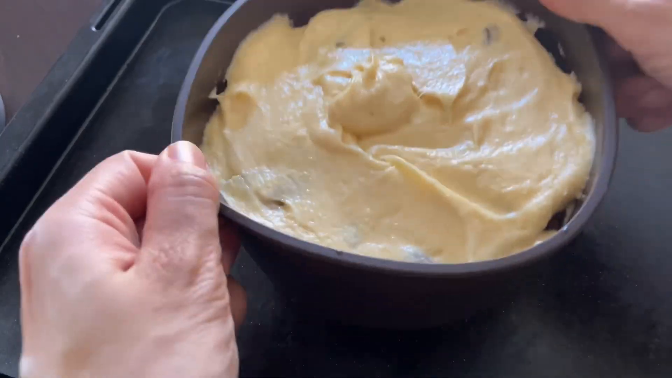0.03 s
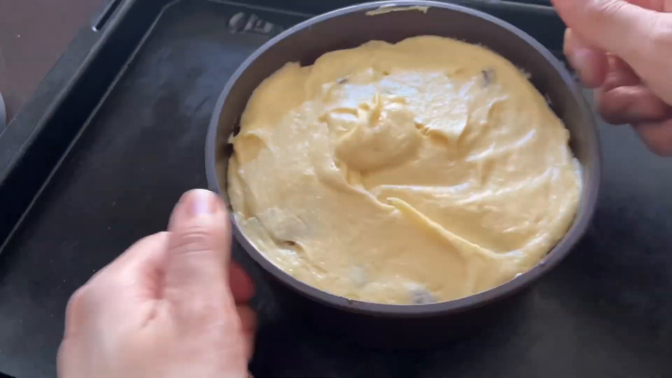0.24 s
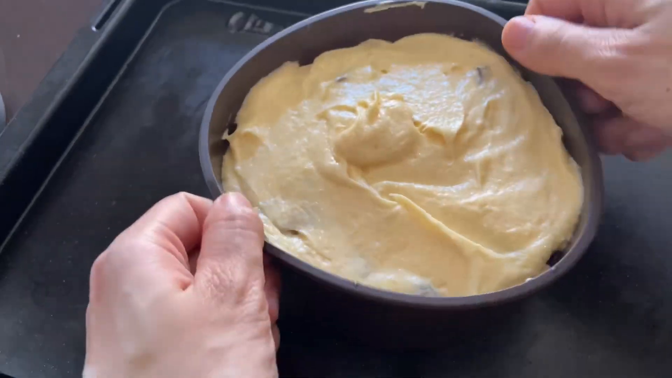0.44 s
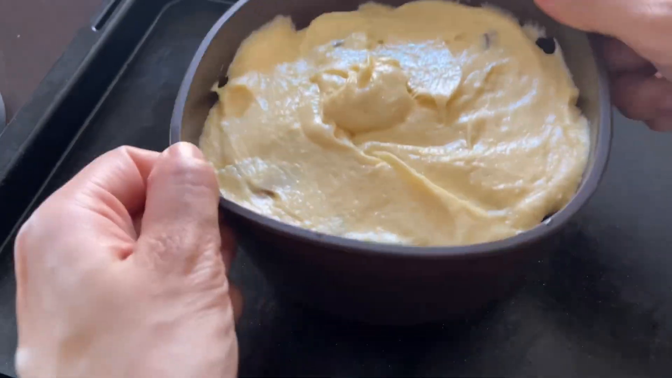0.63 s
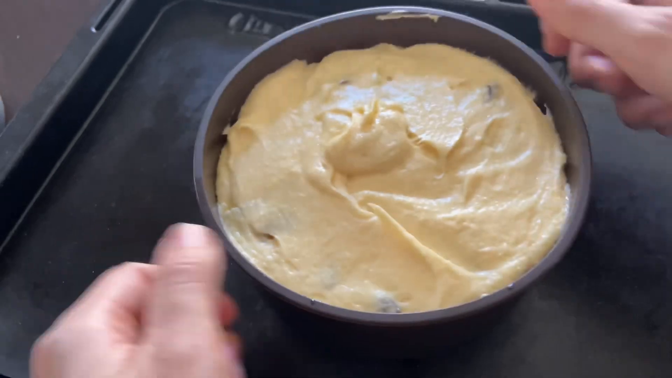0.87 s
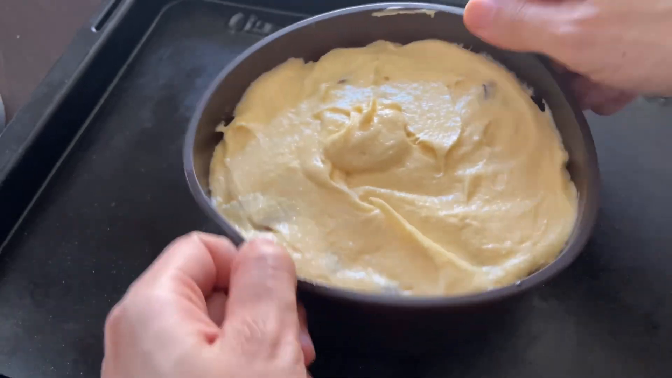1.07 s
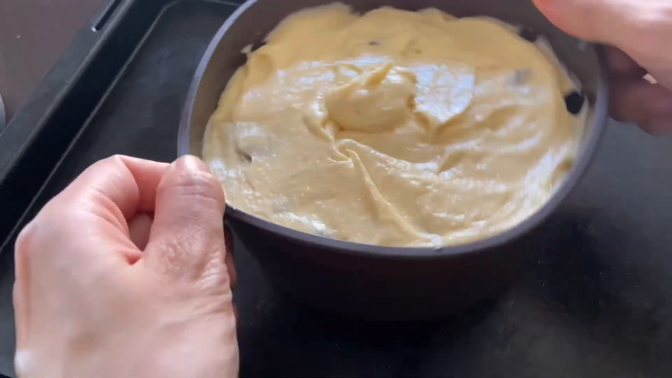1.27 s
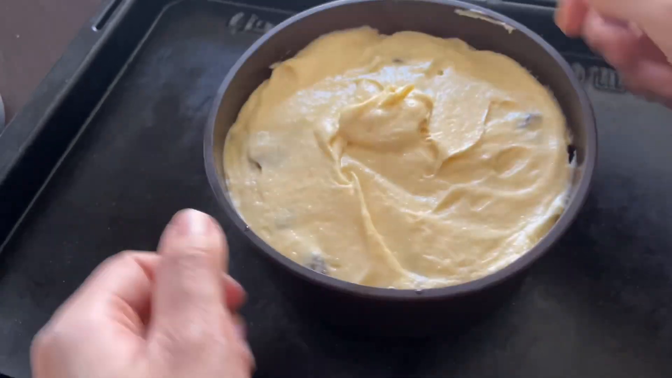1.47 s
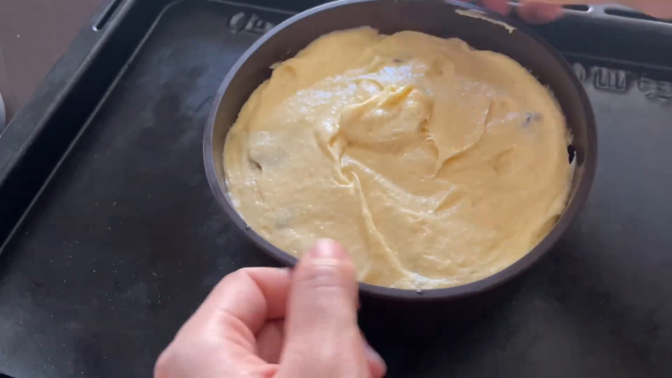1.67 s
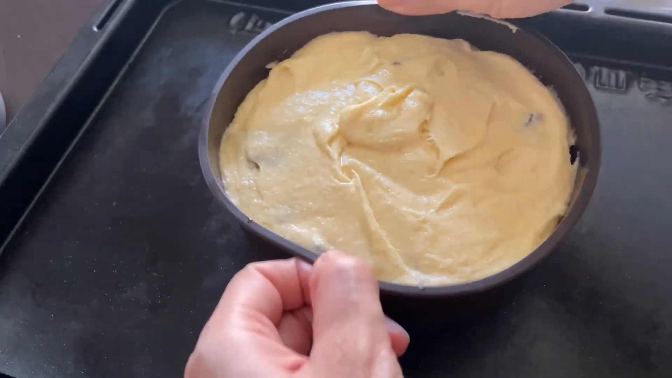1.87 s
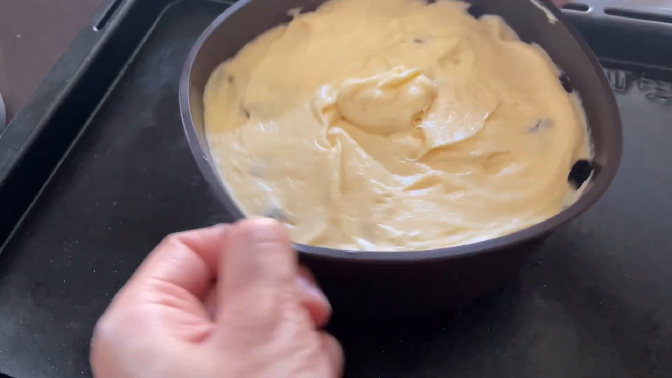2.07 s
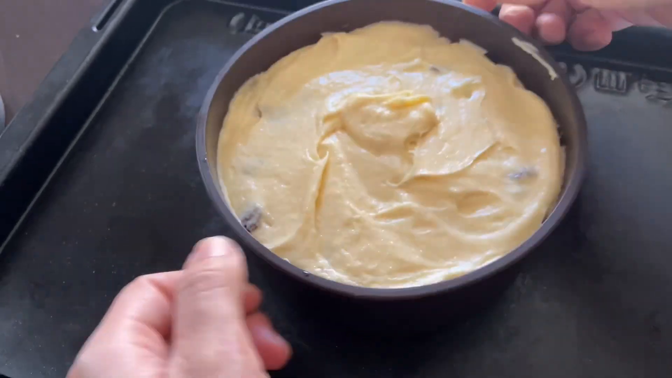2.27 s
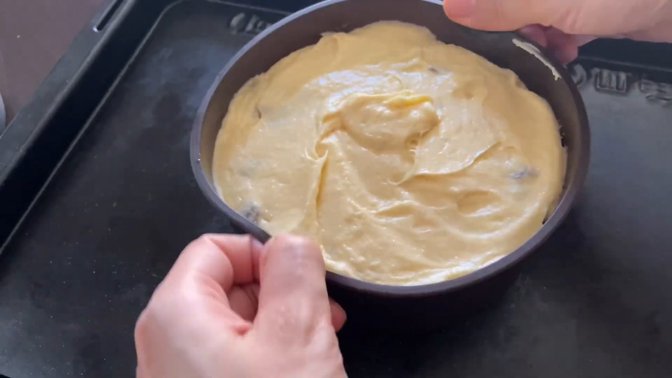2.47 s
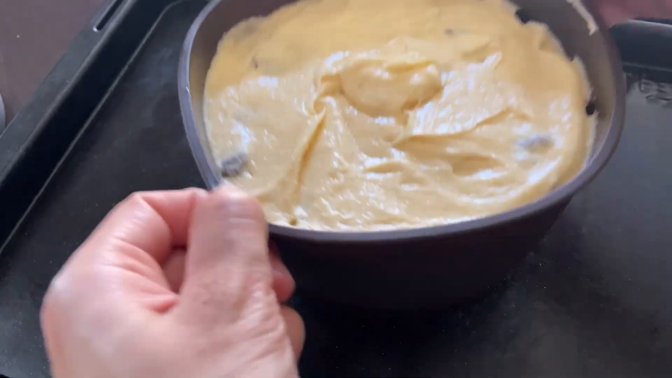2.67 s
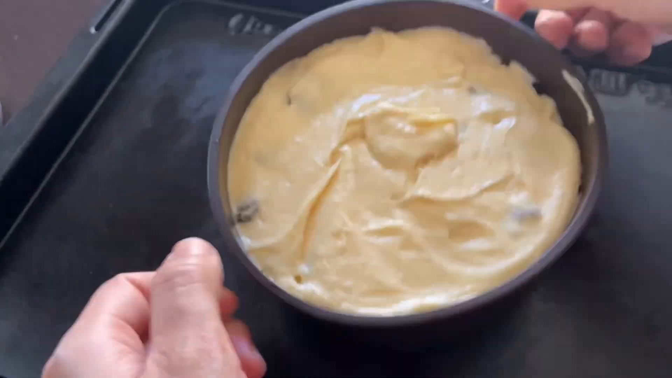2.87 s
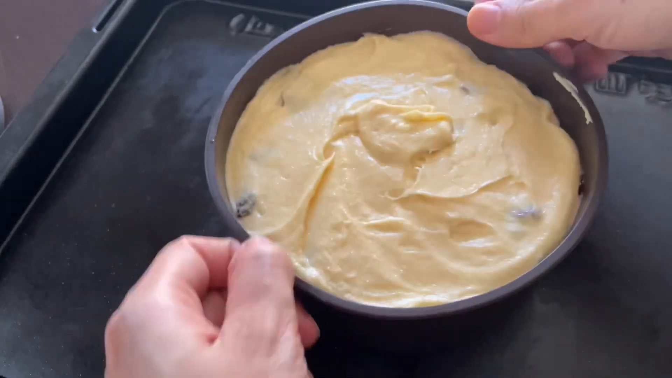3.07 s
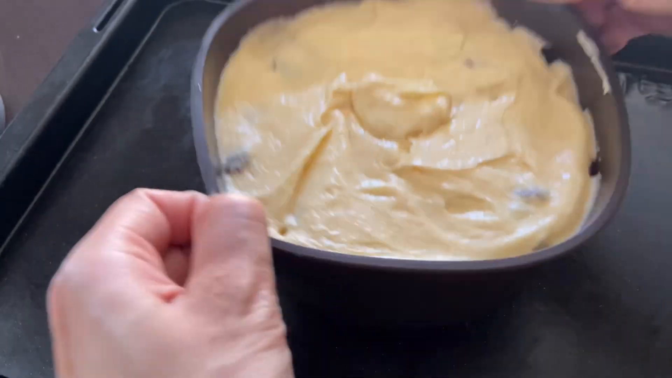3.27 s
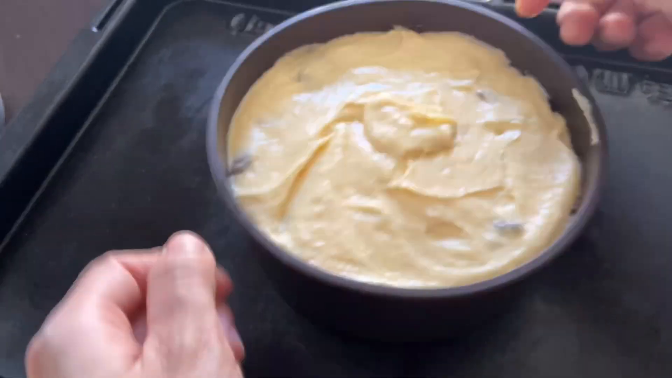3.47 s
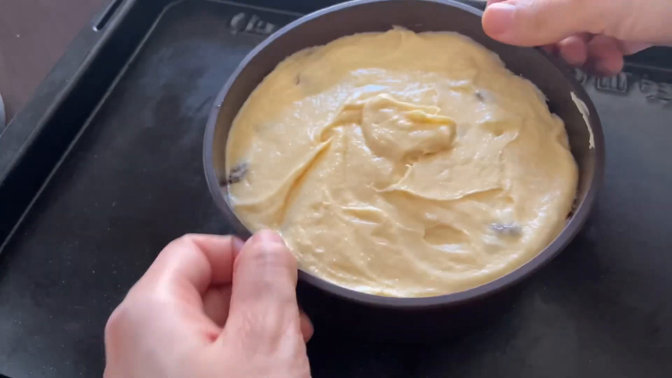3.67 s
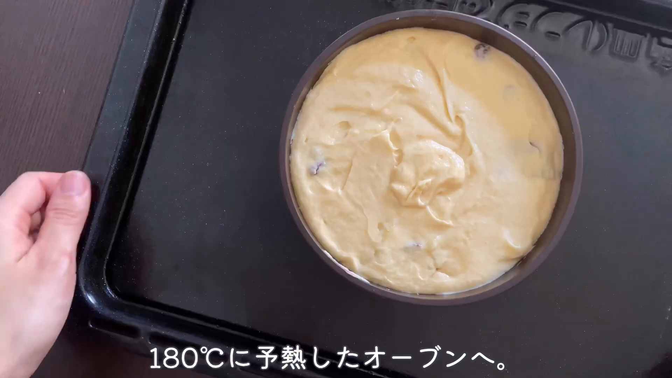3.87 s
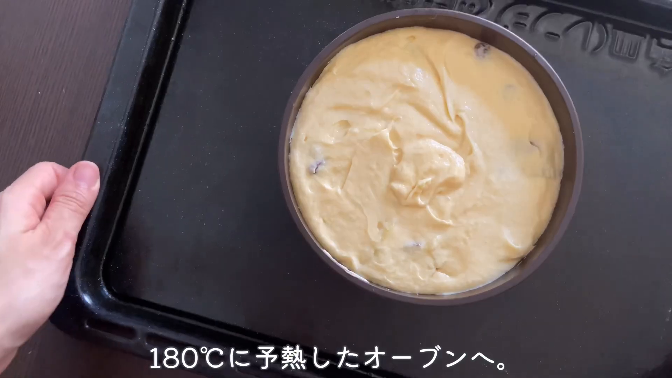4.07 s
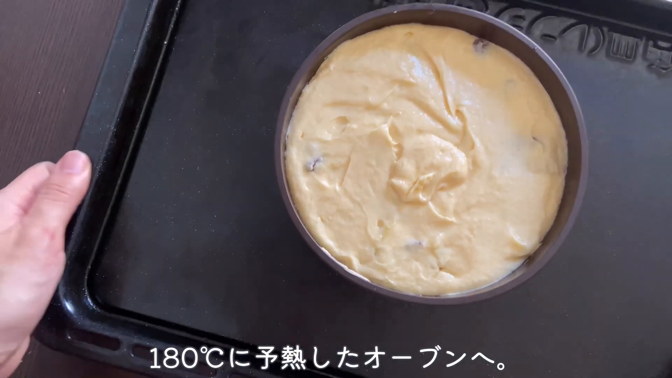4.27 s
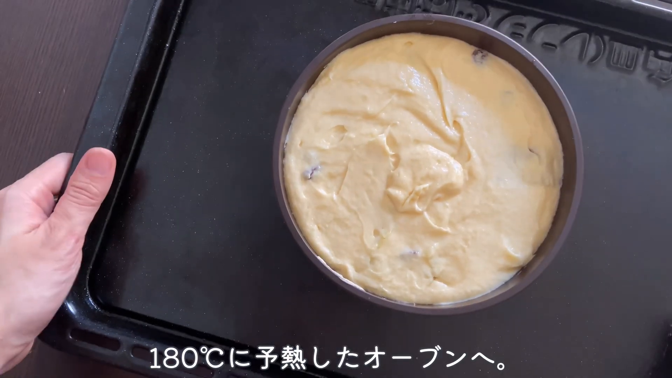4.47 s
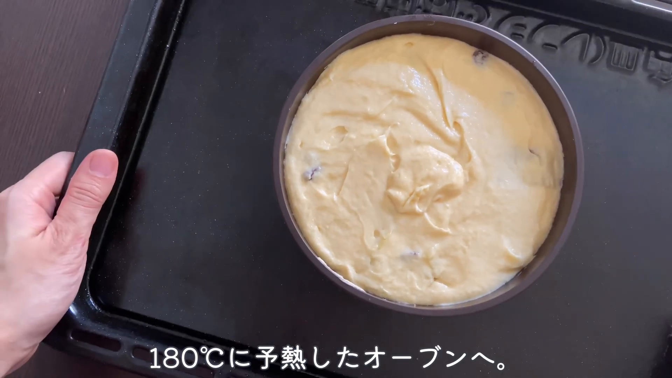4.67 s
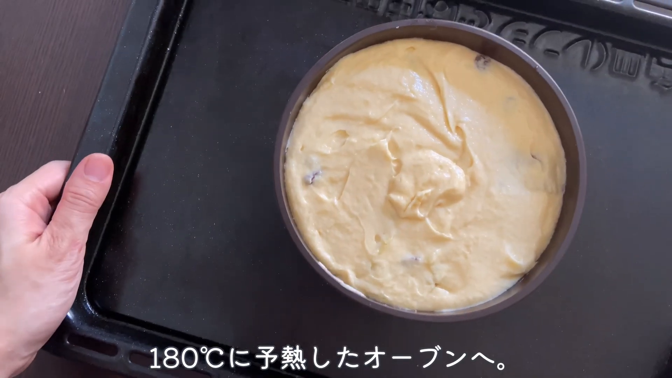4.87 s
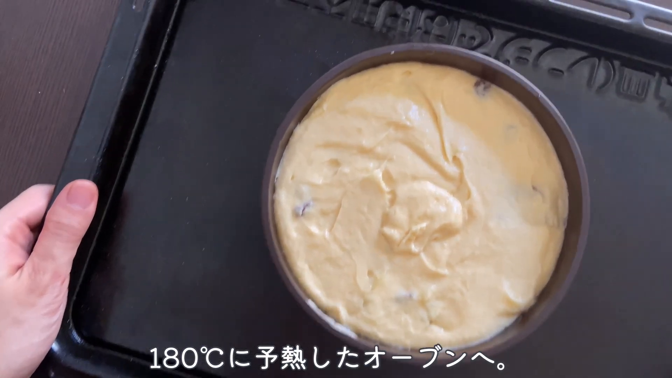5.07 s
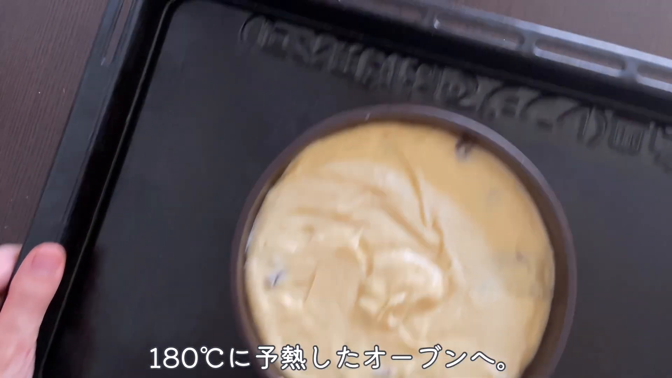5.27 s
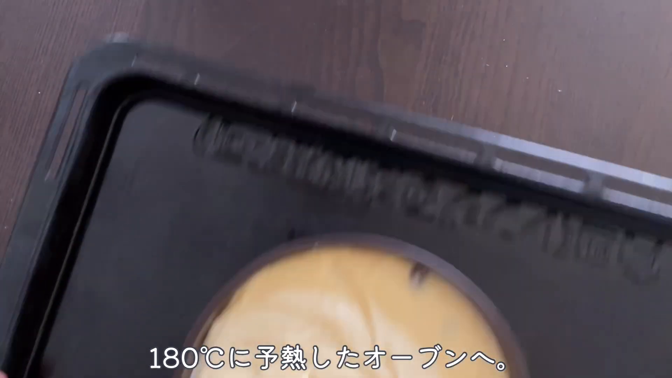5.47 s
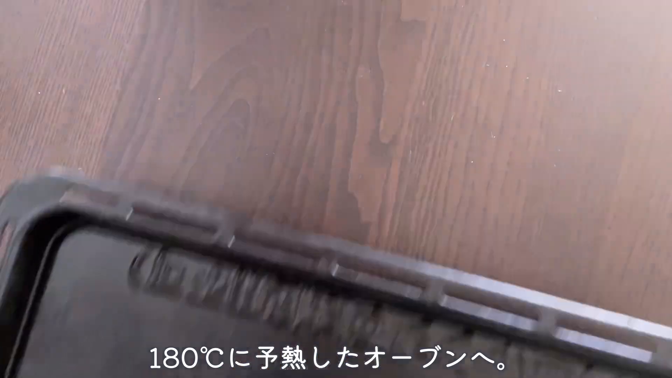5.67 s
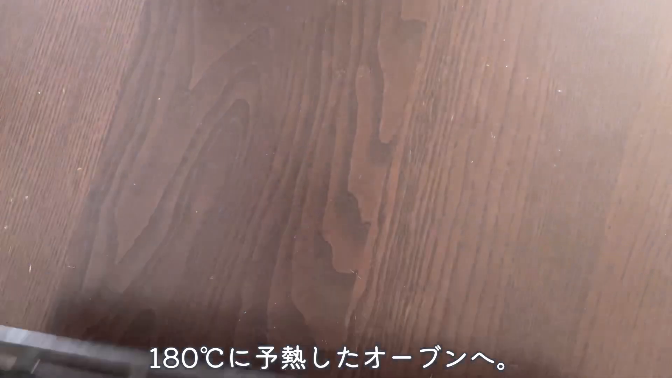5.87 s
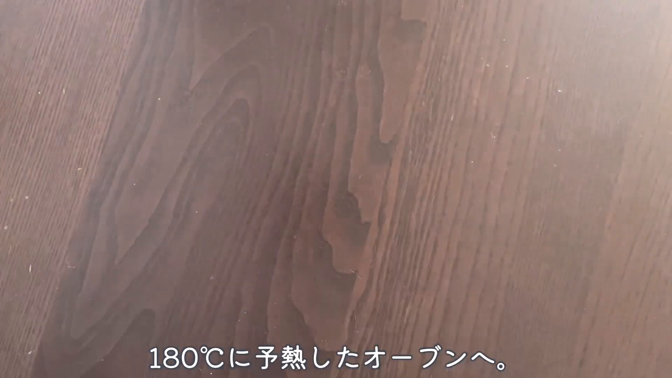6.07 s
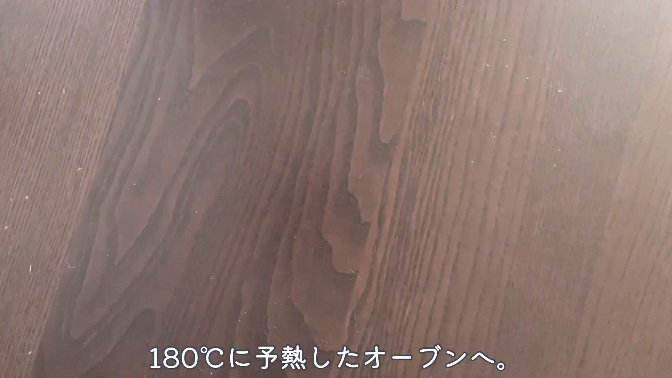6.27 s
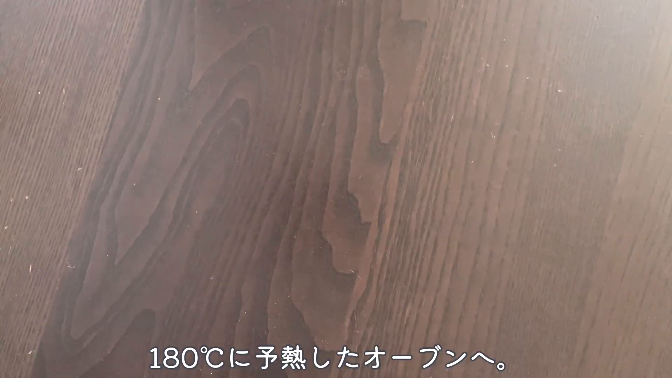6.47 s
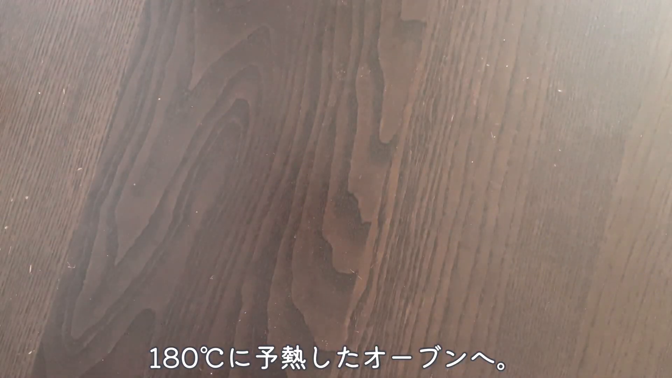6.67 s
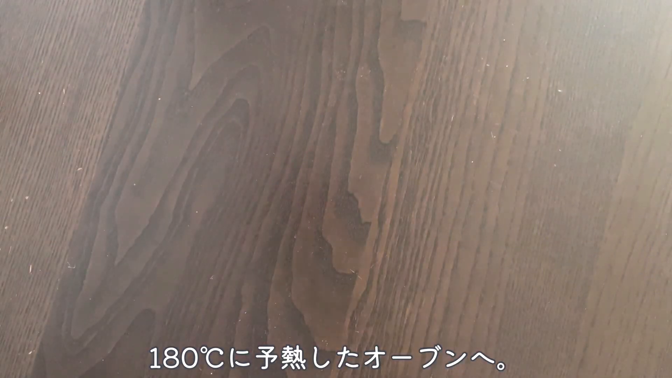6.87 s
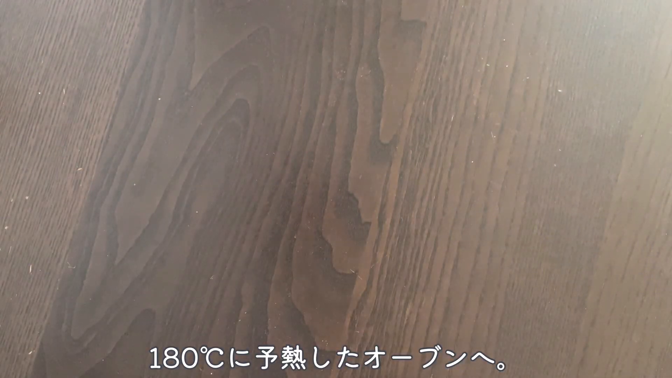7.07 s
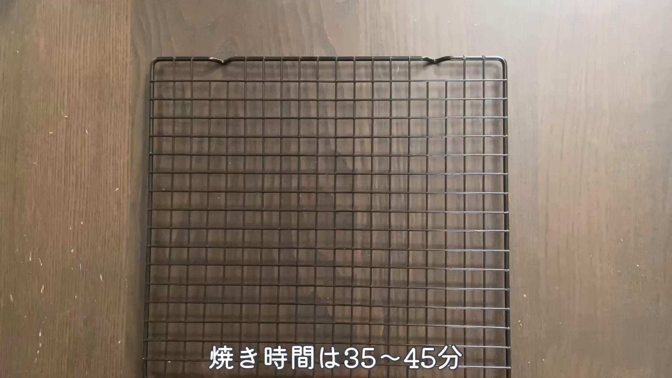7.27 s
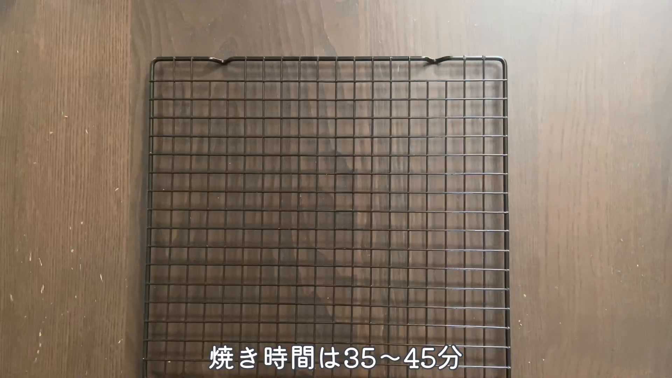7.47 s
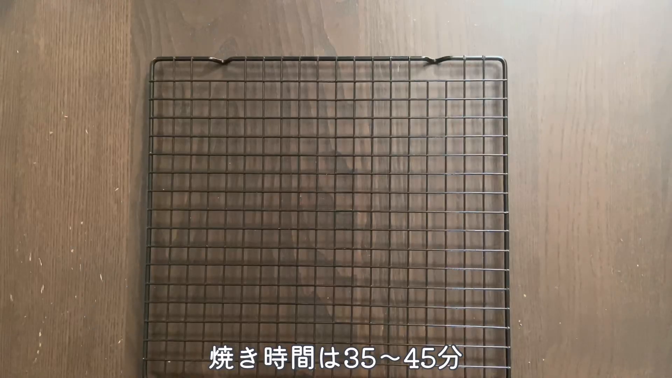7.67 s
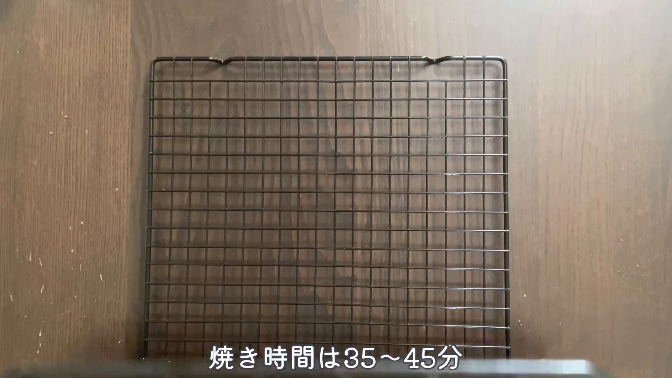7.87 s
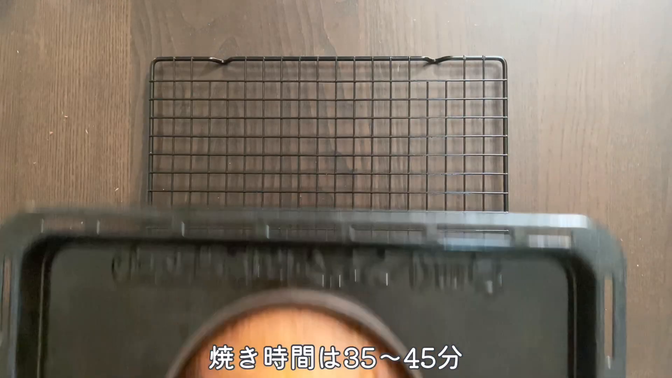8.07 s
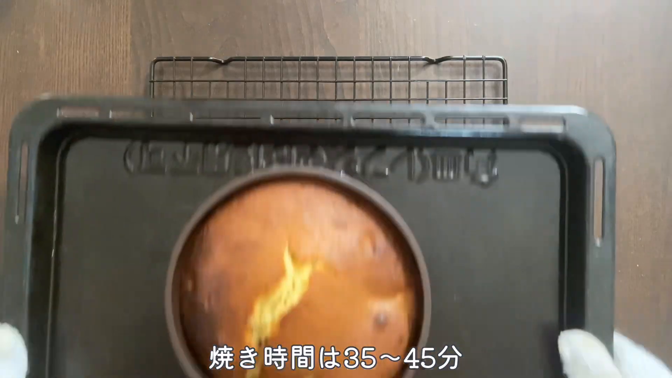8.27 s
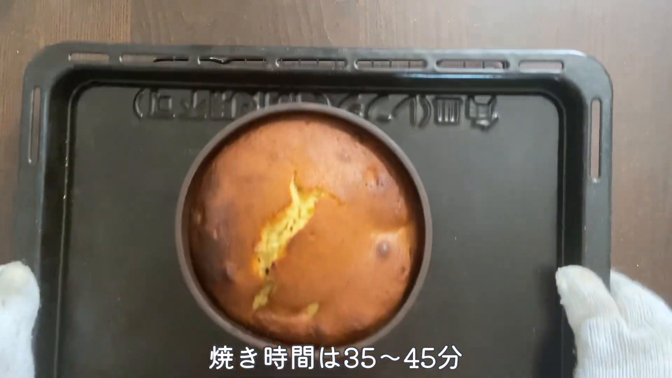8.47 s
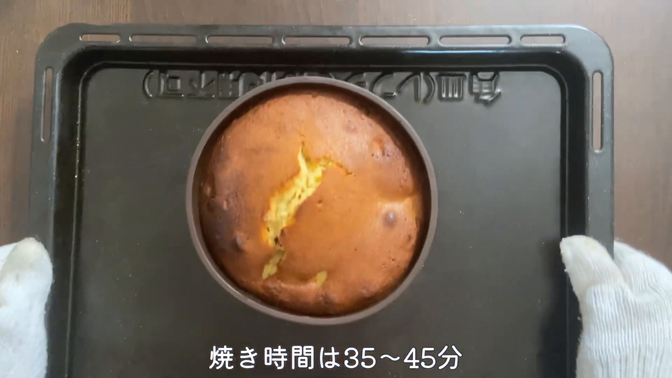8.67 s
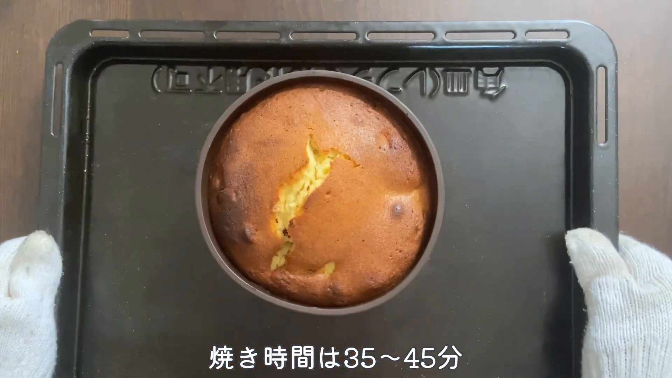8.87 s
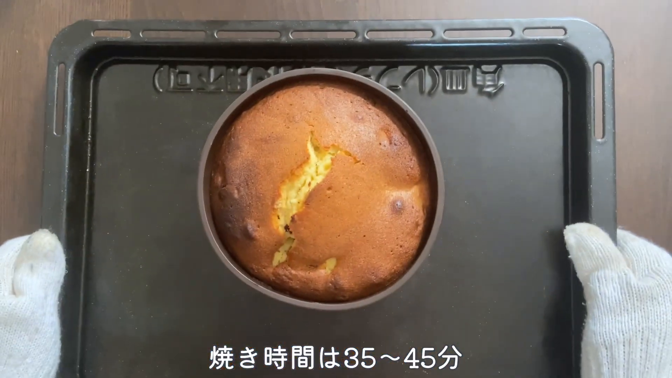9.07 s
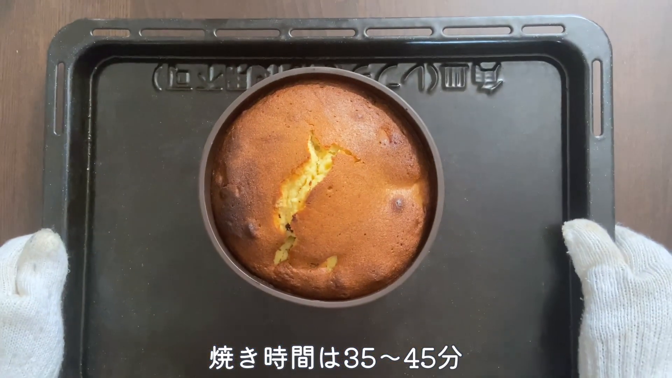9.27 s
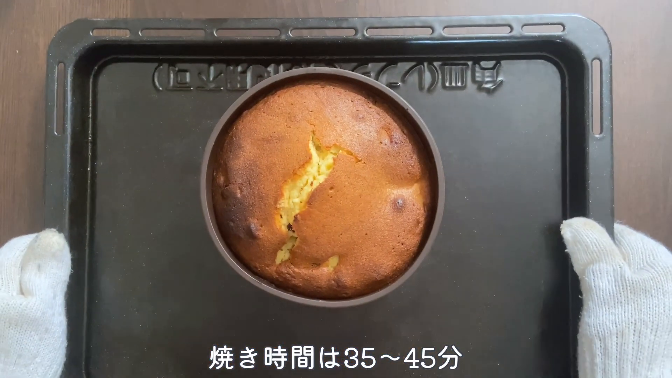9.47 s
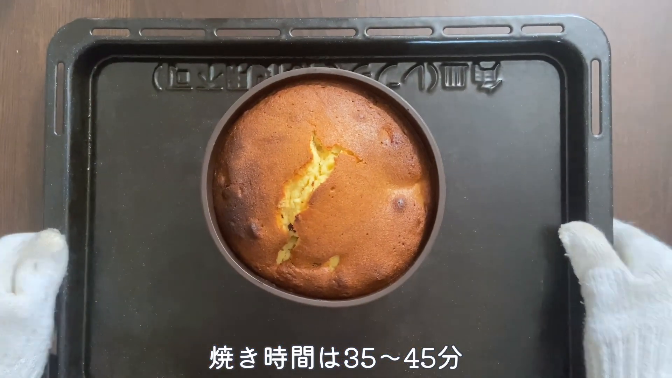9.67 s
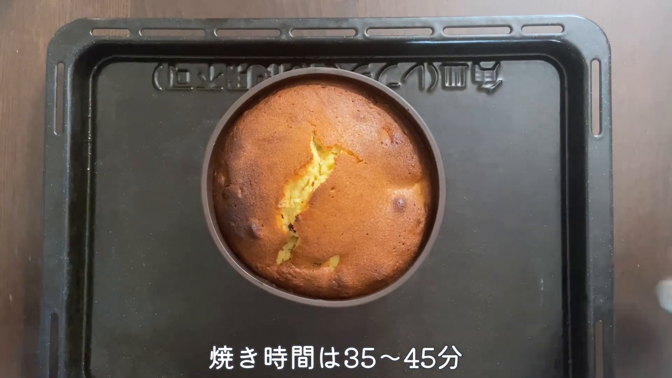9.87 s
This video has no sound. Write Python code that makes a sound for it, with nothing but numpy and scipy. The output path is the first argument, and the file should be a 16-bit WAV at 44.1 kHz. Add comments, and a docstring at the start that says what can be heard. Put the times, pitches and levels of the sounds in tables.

```python
"""Six sharp clattering drops: a cake pan full of batter lands on a steel baking tray, several contacts each.
The tray is slid and carried off with rustling sleeves and small knocks, then set down on a wire rack.
Struck metal is decaying modes plus noise bursts over table thuds; rubbing is grainy coloured noise.
Behind it lie room air, floor thumps, a humming, whining appliance and later a faint ticking.
Two microphone ports hear it with frequency-dependent phase and level, the treble out of step."""
import sys
import numpy as np
from scipy import signal
from scipy.fft import rfft, irfft, next_fast_len
from scipy.io import wavfile
from scipy.ndimage import uniform_filter1d, map_coordinates

SR = 44100
rng = np.random.default_rng(int(sys.argv[2]) if len(sys.argv) > 2 else 0)


def pcm_store(signal):
    """Save signal as 16-bit PCM."""
    levels = np.round(np.clip(np.atleast_2d(signal), -1, 1) * 32767)
    wavfile.write(sys.argv[1], SR, levels.astype(np.int16).T)


N = 437472  # samples

# pan on tray contacts: (time [s], level [dB], clatter [dB], thud [dB], treble tilt [dB per octave])
PAN_CONTACTS = [(0.145, -10.5, -15, -15.5, 1.5), (0.159, -7.5, -12, -17.5, -1.06),
                (0.165, -10, -18.5, -19.5, -1.5), (0.726, -13, -19, -10.5, 1), (0.739, 0.94, -19, -20, 0.4),
                (0.745, -6.5, -19.5, -16.5, -1.3), (0.754, -18.5, -24.5, -3.5, 0.9),
                (0.767, -25.5, -19.5, -6, -1.1), (1.337, -16, -18.5, -6.5, -1.1),
                (1.349, -10, -15, -14, 0.74), (1.366, -13.5, -28.5, -10.5, -0.9),
                (2.156, -21.5, -18.5, -12.5, 2.16), (2.165, -23.5, -12.5, 2.5, 4.55),
                (2.169, -16, -19, -6.5, 2.7), (2.187, -18.5, -20, -15, -2.8), (2.2, -33.5, -32, -2.5, 8),
                (2.805, -2, -15, -14.5, -3.5), (2.811, -4.5, -17, -17.5, -2), (2.818, -1.5, -16, -19, -9),
                (3.445, -7.5, -15, -15, 3.5), (3.452, -9, -17, -9.5, 0.85), (3.46, -2.5, -18, -16.5, -1.8)]
# likeness of the left and right ports in diffuse noise: (frequency [Hz], likeness [0-1])
PORT_LIKENESS = [(30, 1), (100, 0.97), (500, 0.34), (1500, 0.34), (5000, 0.58), (7500, 0.98), (13000, 1)]
LINGER_END_S = 3.82  # the drops' lingering sound stops short here
HUM_END_S = 7.28  # hum and whine end here and the air turns duller


def amp(db):
    """dB to gain."""
    return np.exp(np.asarray(db) * np.log(10) / 20)


def unit(x):
    """x at rms 1."""
    return x / np.sqrt(np.mean(x ** 2) + 1e-20)


def along(points, hz):
    """Read (frequency [Hz], value) points on a log frequency axis."""
    f, v = np.transpose(points)
    return np.interp(np.log(hz + 1), np.log(f + 1), v)


def colour(points):
    """Gain as a function of frequency, from (frequency [Hz], level [dB]) points."""
    return lambda hz: amp(along(points, hz))


def curves(rows):
    """One value per sample for each column after the time."""
    s, *cols = np.transpose(rows)
    return [np.interp(np.arange(N) / SR, s, c) for c in cols]


def wobble(rate):
    """A smooth random curve, rate knots a second."""
    t = np.arange(0, N + 16, 16)
    knots = rng.standard_normal(int(N * rate / SR) + 4)
    return np.interp(np.arange(N), t, map_coordinates(knots, [t * rate / SR]))


def filtered(x, response):
    """Filter x by a complex response of frequency."""
    n = x.shape[-1]
    m = next_fast_len(n + 4096)
    return irfft(rfft(x, m) * response(np.fft.rfftfreq(m, 1 / SR)), m)[..., :n]


def rush(gain, alike, n=N):
    """Stereo noise of rms 1 coloured by gain(Hz); the mid-side balance sets how alike the ports are."""
    def mid_side(hz):
        turn = np.arccos(np.clip(along(alike, hz), -1, 1)) / 2
        return gain(hz) * [np.cos(turn), np.sin(turn)]

    mid, side = filtered(rng.standard_normal((2, n)), mid_side)
    return unit(np.array([mid + side, mid - side]))


def patchy(x, depth_db):
    """x at rms 1 with random patches of gain in time and frequency."""
    z = signal.stft(x, nperseg=512)[2]
    field = uniform_filter1d(rng.standard_normal(z.shape[1:]), size=4, axis=0)
    field = uniform_filter1d(field, size=5, axis=1)
    return unit(signal.istft(z * amp(depth_db * unit(field)), nperseg=512)[1][:, :N])


def dying(t60s, n):
    """Stereo noise whose every frequency dies at its own speed."""
    hz, t, z = signal.stft(rush(np.ones_like, PORT_LIKENESS, n), SR, nperseg=128)
    decay = amp(-60 * t / np.abs(along(t60s, hz))[:, None])
    return signal.istft(z * decay, SR, nperseg=128)[1][:, :n]


def fading(events, t60):
    """Gain that jumps at each (time [s], level [dB]) event and dies away; overlaps add as power."""
    kicks = np.zeros(N)
    for s, db in events:
        kicks[round(s * SR)] = amp(db) ** 2
    power = signal.lfilter([1], [1, -amp(-120 / t60 / SR)], kicks)
    return np.sqrt(uniform_filter1d(power, size=900).clip(0))


def after_drops(t60):
    """Gain of what lingers after the drops, until it stops short."""
    blows = [(s, db) for s, db, *_ in PAN_CONTACTS]
    return fading(blows, t60) * (np.arange(N) < LINGER_END_S * SR)


def add(out, s, sound):
    """Mix a sound in at time s."""
    seat = out[:, round(s * SR):][:, :sound.shape[1]]
    seat += sound[:, :seat.shape[1]]


def air():
    """Room air noise, duller after the hum ends, over a lumpy rumble; air and table stir after a drop."""
    # room air up to the end of the hum, and after it: (frequency [Hz], relative level [dB])
    colour_before = [(60, -13), (75, 6), (150, 3), (210, -1), (285, -5), (500, -9.5), (800, -18.5),
                     (1250, -18.5), (1600, -29.5), (2200, -29.5), (4200, -32), (6000, -43), (12000, -45),
                     (15500, -49.5)]
    colour_after = [(60, -13.5), (130, 5), (200, -2.5), (290, -8), (360, -8), (500, -17.5), (900, -24.5),
                    (1250, -27.5), (1600, -34), (3000, -37.5), (6000, -40.5), (12000, -49), (15500, -60.5)]
    # room air without the drops' lingering: (time [s], level [dB])
    air_levels = [(0, -58.5), (3.8, -59.5), (4.1, -65), (4.35, -52.5), (4.6, -60.5), (6, -60), (7.4, -61),
                  (7.8, -64.5), (9, -63.5), (9.55, -58.5), (9.92, -64.5)]
    # low thumps through the floor, likely footsteps: (time [s], level [dB])
    footsteps = [(4.6, -66.5), (4.87, -59), (5.16, -57), (5.4, -62), (5.97, -49.5), (6.4, -59),
                 (6.62, -60.5), (6.8, -57.5), (6.96, -56), (7.22, -41.5), (8.05, -54.5), (8.3, -62),
                 (9.04, -60)]

    def low(corner_hz):
        return rush(lambda f: f ** 6 / (corner_hz ** 6 + f ** 6) / (1 + (f / 75) ** 6), [(40, 0.6)])

    t = np.arange(N) / SR
    before = t < HUM_END_S
    hiss = before * rush(colour(colour_before), PORT_LIKENESS)
    hiss = hiss + ~before * rush(colour(colour_after), PORT_LIKENESS)
    linger = amp(-51.5) * after_drops(t60=1.3)
    level = np.hypot(amp(curves(air_levels)[0] + 2.6 * wobble(7)), linger)
    rumble_gain = amp(-68 + 4.5 * wobble(14)) + fading(footsteps, t60=0.26)
    rumble = rumble_gain * low(corner_hz=50.4)
    shudder = amp(-47 + 2.7 * wobble(9)) * after_drops(t60=1.8) * low(corner_hz=26)
    # a faint tone of the room at 279 Hz, nearly steady
    buzz = amp(-73.5 + 2.2 * wobble(2.3)) * np.sin(2 * np.pi * 279 * t + .7 * wobble(12))
    return level * hiss * amp([[-1.1], [1.1]]) + rumble + shudder + buzz


def appliance():
    """Mains hum and a motor whine of drifting partials that end together; a blurred noise drone follows."""
    # appliance at the microphone: (time [s], mains hum level [dB], whine level [dB])
    hum_levels = [(0, -44, -72), (3.8, -45.5, -74.5), (3.85, -50, -69.5), (4.3, -45, -73.5),
                  (6.1, -44.5, -71), (6.3, -44, -77), (7, -44.5, -77), (7.15, -44, -72.5), (7.3, -46, -66)]
    # whine partials: (frequency [Hz], relative level [dB])
    partials = [(214, 3.5), (714, 1), (1427, -14), (2143, -17.5)]
    t = np.arange(N) / SR
    hum_db, whine_db = curves(hum_levels)
    hum = amp(hum_db + 1.0 * wobble(5.8)) * np.sin(2 * np.pi * 100.6 * t + .3 * wobble(9.5))
    drift = .8 * wobble(4.3)  # phase, shared in proportion to frequency
    whine = sum(amp(db + 0.57 * wobble(27)) * np.sin(2 * np.pi * hz * t + drift * hz / 714)
                for hz, db in partials)
    drone = amp(-59 + 1.6 * wobble(4)) * rush(lambda f: 1 / (1 + ((f - 87) / 12) ** 2), [(90, 1.0)])
    before = t < HUM_END_S
    return before * (hum * amp([[-1.3], [1.3]]) + amp(whine_db) * whine) + ~before * drone


def ticking():
    """A faint mechanism ticks about eight times a second after the hum ends: gated narrow-band noise."""
    start_s, rate_hz = 7.548, 8.04
    t = np.arange(N) / SR - start_s
    since = (t * rate_hz % 1) / rate_hz  # seconds since the last tick
    beat = (t > 0) * amp(-60 * since / 0.11 + 1.2 * wobble(8)) * (1 - np.exp(-since / 0.0038))
    return amp(-71.5) * beat * rush(lambda f: 1 / (1 + ((f - 1240) / 170) ** 4), PORT_LIKENESS)


def strokes():
    """Gain of cloth, hiss and scrape: every stroke rises, holds and falls alike, long ones more gently."""
    # rubs of sleeves, hands and tray, and one short click at 4.246 s:
    # (start [s], hold [s], cloth level [dB], thin hiss level [dB], scrape level [dB])
    rubs = [(0.356, 0.0059, -66, -110, -110), (.43, 0.021, -72, -110, -110),
            (1.105, 0.058, -66.5, -110, -110), (1.937, 0.048, -68.5, -110, -110),
            (3.839, 0.023, -60.5, -77, -62), (3.896, .07, -69.5, -87.5, -79),
            (4.037, 0.1, -71, -80.5, -64.5), (4.167, 0.027, -72, -80, -56), (4.207, 0.032, -65, -73.5, -56),
            (4.246, .002, -54, -58.5, -60), (4.261, 0.054, -62, -73.5, -65.5),
            (4.375, 0.1, -67, -80, -63.5), (4.519, 0.037, -90.5, -98, -76), (4.32, .05, -69, -78, -53),
            (4.736, .1, -77, -110, -74), (5.63, .05, -76, -110, -110), (5.855, 0.054, -70, -95, -61),
            (6.058, 0.068, -75, -85, -70), (5.952, .07, -83, -95.5, -69), (6.178, .04, -70.5, -68.5, -76),
            (6.249, .1, -60, -62, -68), (6.375, 0.056, -62.5, -70, -63), (6.498, 0.096, -70, -87.5, -76),
            (6.612, 0.031, -64, -66, -70), (6.695, .06, -80.5, -88, -76), (7.192, .1, -67.5, -76, -71),
            (7.3, .025, -62.5, -79.5, -66.5), (7.4, .11, -71.5, -79, -77), (8.043, 0.16, -87, -110, -75),
            (8.585, 0.12, -80.5, -110, -110), (9.616, 0.1, -72, -110, -68.5)]
    t, shape = np.arange(0, N + 64, 64) / SR, []
    for s, hold, *_ in rubs:
        rise = 0.022 + 0.39 * hold  # seconds to gain 25 dB
        fall = 0.0087 + 0.4 * hold  # seconds to lose the first 14 dB, then slower
        end = s + hold
        knots = [s - 3 * rise, s, end, end + fall, end + 6 * fall]
        shape.append(amp(np.interp(t, knots, [-75, 0, 0, -14, -75])))
    gains = amp(np.array(rubs)[:, 2:].T) @ shape
    return [np.interp(np.arange(N) / SR, t, gain) for gain in gains]


def rustle():
    """Cloth and skin rub in uneven grains; the tray scrapes in its low resonances."""
    # rubbing cloth: (frequency [Hz], relative level [dB])
    cloth_colour = [(150, -32.5), (350, -5), (1000, -5), (3000, -5), (7000, -7.5), (9200, -6),
                    (12300, -14.5), (14300, -13), (15600, -15)]
    # resonances of tray and hands rubbing: (centre [Hz], width [Hz], relative level [dB])
    resonances = [(345, 20, 0), (594, 180, -1.5), (978, 180, -6), (1100, 140, -7), (1860, 90, -18.5),
                  (2200, 400, -20)]

    def body(f):
        return np.sqrt(sum(amp(db) ** 2 / (1 + (2 * (f - c) / w) ** 2) for c, w, db in resonances))

    grain = amp(1.4 * wobble(48) + 1.8 * wobble(300))
    soft, thin, rough = strokes()
    cloth = soft * unit(grain * rush(colour(cloth_colour), PORT_LIKENESS))
    fizz = thin * rush(lambda f: 1 / (1 + ((f - 12000) / 2200) ** 4), PORT_LIKENESS)
    # faint uneven rubbing while the tray is carried
    carried = (np.arange(N) > LINGER_END_S * SR) & (np.arange(N) < HUM_END_S * SR)
    rough = rough + carried * amp(-79 + 5.5 * wobble(7))
    scrape = amp(1.3 * wobble(60)) * patchy(rush(body, PORT_LIKENESS), depth_db=3.5) * rough
    return cloth + fizz + scrape


def handling():
    """Ticks are a brief coloured snap, knocks a short ring mixed with a dull puff."""
    # fingertip ticks on the rim: (time [s], level [dB], pitch [Hz])
    rim_ticks = [(0.3243, -45, 1670), (0.4254, -56, 1420), (0.48, -46.5, 6440), (0.5065, -44.5, 3812),
                 (0.5758, -59.5, 11030), (0.9484, -46.5, 1360), (1.871, -51.5, 5160), (2.347, -47.5, 1620),
                 (2.3655, -49.5, 1210), (2.6921, -49, 4530), (3.019, -51, 1470), (3.2074, -53.5, 2590),
                 (3.3565, -54, 6500), (3.3996, -41.5, 6090), (3.6342, -48.5, 1490), (4.1964, -41.5, 2100),
                 (4.2463, -32, 1310), (7.3966, -49.5, 1730), (7.5085, -49.5, 3510)]
    # small knocks while the tray is handled: (time [s], level [dB], pitch [Hz], dullness [0-1])
    tray_knocks = [(4.041, -45, 415, 0.83), (4.185, -37.5, 630, .37), (4.199, -33, 630, 0.59),
                   (4.243, -32.5, 611, 0.47), (4.319, -38, 362, 0.3), (4.359, -40, 698, 0.4),
                   (4.709, -49.5, 713, 0.5), (4.819, -30.5, 336, 0.8), (4.833, -39, 570, .3),
                   (5.036, -48, 890, 0), (5.09, -53.5, 744, .3), (5.356, -52, 1037, 0.04),
                   (5.549, -56, 1140, 0.4), (5.61, -40.5, 464, 0.5), (5.748, -48, 734, 0.13),
                   (5.932, -49, 495, .1), (6.429, -48, 920, 0.43), (6.619, -54, 883, .2),
                   (7.203, -50, 724, 0.5), (7.296, -49, 1070, 0.66)]
    out, t = np.zeros((2, N)), np.arange(SR // 8) / SR
    for s, db, hz in rim_ticks:
        snap = rush(lambda f: 1 / (1 + (np.log2((f + 1) / hz) / 0.31) ** 2), PORT_LIKENESS, len(t))
        tick = 0.39 * np.sin(2 * np.pi * hz * t) + 0.6 * snap
        add(out, s, amp(db - 60 * t / 0.0071) * tick)
    for s, db, hz, dull in tray_knocks:
        puff = rush(lambda f: f / (90 + f) / (1 + (f / (1.57 * hz)) ** 4), PORT_LIKENESS, len(t))
        knock = (1 - dull) * np.sin(2 * np.pi * hz * t) + dull * 0.71 * puff
        t60 = 0.049 * (1 + 0.77 * dull)  # a dull knock dies slower
        add(out, s, amp(db - 60 * t / t60) * (1 - np.exp(-t / 0.0012)) * knock)
    return out * amp([[-1.2], [1.2]])


def ring(modes, t, damping, scatter_db, blur, bright_db=0, tilt_db=0):
    """Modes struck at new strengths; loose contact blurs their phase and damps the first swings."""
    hz, db, t60 = np.transpose(modes)[:, :, None]
    luck = rng.standard_normal((len(modes), 4))
    gain = amp(db + scatter_db * luck[:, :1]) * np.sign(luck[:, 1:2])
    decay = amp(-60 * t / t60) * (damping + (1 - damping) * amp(-60 * t / 0.048))
    # phase wanders in steps of 20 samples, more for high modes
    steps = np.sqrt(20) * rng.standard_normal((len(modes), len(t) // 20 + 1))
    walk = np.repeat(np.cumsum(steps, axis=1), 20, axis=1)[:, :len(t)]
    wander = uniform_filter1d(blur * (1 + hz / 2600) * walk, size=40, axis=1)
    waves = gain * decay * np.sin(2 * np.pi * hz * t + wander) / np.sqrt(np.sum(gain ** 2))
    # each contact sets its own level and tilt of the high modes
    waves *= amp(bright_db * (hz > 1100) + tilt_db * np.log2(np.maximum(hz / 2500, 1)))
    return amp(2 * np.stack([luck[:, 2], luck[:, 3]])) @ waves  # each mode radiates its own way


def burst(gain, t60s, t, rest, crack_t60):
    """A noisy crack of peak 1 that leaves a weaker rattle behind."""
    x = filtered(dying(t60s, len(t)) * (rest + amp(-60 * t / crack_t60)), gain)
    return x / np.abs(x).max()


def contacts(rows, modes, clatter, t60s, ring_db, boom_db, noise_db, thud_db, damping, usual_db):
    """Each contact rings the metal, rattles it and thumps the table."""
    # the table underneath: (frequency [Hz], relative level [dB], t60 [s])
    table_modes = [(47.6, -5.5, 0.29), (75.3, -5.5, 0.9), (114, -3.5, 0.27), (139, 5.5, 0.28),
                   (163, -0.5, .2), (213, 0.5, 0.12), (246, 0, 0.1)]
    # dense low sheet modes: (frequency [Hz], relative level [dB])
    boom_colour = [(60, -31.5), (130, -4), (300, 0), (560, 1.5), (900, -9), (1300, -14.5), (2000, -47)]
    first_pan_db, last_pan_db, roll_s = -2.5, -0.55, 0.0099  # left minus right
    out, t = np.zeros((2, N)), np.arange(SR // 3) / SR
    first = -1
    for s, db, clatter_db, low_db, tilt_db in rows:
        first = s if s - first > .12 else first  # a new landing
        # the right edge lands first, later contacts roll to the middle
        pan_db = last_pan_db + (first_pan_db - last_pan_db) * np.exp((first - s) / roll_s)

        def edge(hz):  # each contact has its own treble tilt
            return amp(along(clatter, hz) + tilt_db * np.log2(1 + hz / 2500))

        sheet = amp(ring_db) * ring(modes, t, damping, scatter_db=3.5, blur=0.045,
                                    bright_db=clatter_db - usual_db, tilt_db=tilt_db)
        boom = amp(boom_db) * burst(colour(boom_colour), t60s, t, damping, crack_t60=0.039)
        rattle = amp(noise_db + clatter_db) * burst(edge, t60s, t, damping, crack_t60=0.089)
        thud = amp(thud_db + low_db) * ring(table_modes, t, 1.0, scatter_db=3.0, blur=0.021)
        sound = (sheet + boom + thud + rattle) * (1 - np.exp(-t / 0.00015))
        add(out, s, amp(db) * amp([[pan_db / 2], [-pan_db / 2]]) * sound)
    return out


def tray_on_rack():
    """The tray is set down: loose contacts ring the wire rack and rattle it."""
    # tray on rack contacts: (time [s], level [dB], clatter [dB], thud [dB], treble tilt [dB per octave])
    rack_contacts = [(9.022, -46, 4.5, -11, 0), (9.032, -42.5, 1.5, -16, 0), (9.05, -33, -10, -32, -2.7),
                     (9.074, -37.5, -27, -3.5, -5), (9.197, -51, -17.5, 8, -11),
                     (9.372, -32, -16.5, -4.5, 9), (9.384, -38, -13, -1.5, -9),
                     (9.421, -33.5, -11, -19, -19), (9.441, -42.5, -13.5, -9, -15),
                     (9.546, -66.5, -0.4, 6, 0), (9.624, -47.5, -28, 6, -5.5), (9.699, -64, 0, 7.5, 2)]
    # rack modes: (frequency [Hz], relative level [dB], t60 [s])
    rack_modes = [(293.2, -1, 0.36), (455, 4.5, 0.18), (660, 7, 0.16), (787, -1, 0.1), (945, -2.5, 0.13),
                  (1150, -11.5, 0.16), (1670, -22, 0.14), (2130, -6, 0.21), (2300, -13, 0.16),
                  (2630, -9, 0.12), (3220, -18, 0.1), (4550, -31, 0.087), (4600, -8, 0.044)]
    # rattle of the rack: (frequency [Hz], relative level [dB])
    rattle_colour = [(400, -36), (900, -1.5), (2100, -1.5), (2700, -10.5), (4500, -11.5), (6000, -19.5),
                     (8000, -23), (12500, -29.5), (15500, -51.5)]
    # decay of that rattle: (frequency [Hz], t60 [s])
    rattle_t60 = [(300, 0.24), (2000, 0.246), (5000, 0.26), (12000, 0.049)]
    return contacts(rack_contacts, rack_modes, rattle_colour, rattle_t60, ring_db=-4.0, boom_db=-3.5,
                    noise_db=9.0, thud_db=-2.5, damping=0.91, usual_db=-12)


def pan_drops():
    """The full pan drops on the tray: each landing strikes the steel sheet several times and damps it."""
    # tray modes: (frequency [Hz], relative level [dB], t60 [s])
    tray_modes = [(416, -5, 0.13), (574, 5, 0.13), (630, -7.5, 0.059), (678, -4, 0.11), (780, -16.5, 0.084),
                  (907, -8.5, 0.14), (1066, -13, 0.22), (1460, -15, 0.21), (1610, -15, .18),
                  (1726, -13, 0.14), (2070, -13.5, 0.22), (2310, -20.5, 0.22), (2498, -17.5, 0.2),
                  (2804, -18, 0.15), (2871, -23, 0.18), (3338, -31, .18)]
    # clatter of pan on tray: (frequency [Hz], relative level [dB])
    clatter_colour = [(500, -42), (1000, -1.5), (2100, 3.5), (3100, -4.5), (5000, -7.5), (7500, -11),
                      (9200, -14.5), (12500, -21.5), (15500, -32)]
    # decay of that clatter: (frequency [Hz], t60 [s])
    clatter_t60 = [(300, 0.17), (1500, 0.13), (2800, 0.17), (5000, 0.13), (12000, 0.17)]
    return contacts(PAN_CONTACTS, tray_modes, clatter_colour, clatter_t60, ring_db=-8.5, boom_db=1.0,
                    noise_db=5.0, thud_db=-3.0, damping=0.27, usual_db=-18)


def kitchen(x):
    """The room's short answer: x convolved with dying noise, 250 samples late."""
    # reverberation: (frequency [Hz], t60 [s])
    room_t60 = [(100, 0.25), (500, 0.24), (3000, 0.16), (12000, 0.29)]
    tail = dying(room_t60, SR // 2)
    late = np.pad(x, ((0, 0), (250, 0)))
    return signal.fftconvolve(late, tail / np.linalg.norm(tail[0]), axes=1)[:, :N]


def scene():
    """All sources, the struck ones with their room."""
    background = air() + appliance() + ticking()
    hits = handling() + tray_on_rack() + pan_drops()
    return background + rustle() + hits + amp(-11.0) * kitchen(hits)


def record(dry):
    """The ports differ in phase and level by frequency; peaks saturate softly, then a steep treble limit."""
    # phase by which the left port leads: (frequency [Hz], lead [rad])
    left_lead = [(0, 0), (700, -.25), (1700, .6), (3800, -.3), (4800, -.8), (5850, -.2), (6900, .6),
                 (7900, 2.1), (8400, 3.1), (9600, 3.2), (11000, 5.3), (12000, 6.2), (13100, 6.6),
                 (15200, 9.4)]
    # left port against right: (frequency [Hz], level difference [dB])
    port_tilt = [(30, 0.5), (100, 0), (500, 0), (4000, -3), (8000, 0), (15000, 0.5)]
    ceiling, top_hz = 0.93, 15670

    def ports(hz):
        phase = np.exp(.5j * np.outer([1, -1], along(left_lead, hz)))
        return phase * amp(np.outer([.5, -.5], along(port_tilt, hz)))

    x = filtered(dry, ports)
    x = x / (1 + np.abs(x / ceiling) ** 4) ** (1 / 4)
    return filtered(x, lambda hz: hz < top_hz)


dry = scene()
out = record(dry)
pcm_store(out)
```